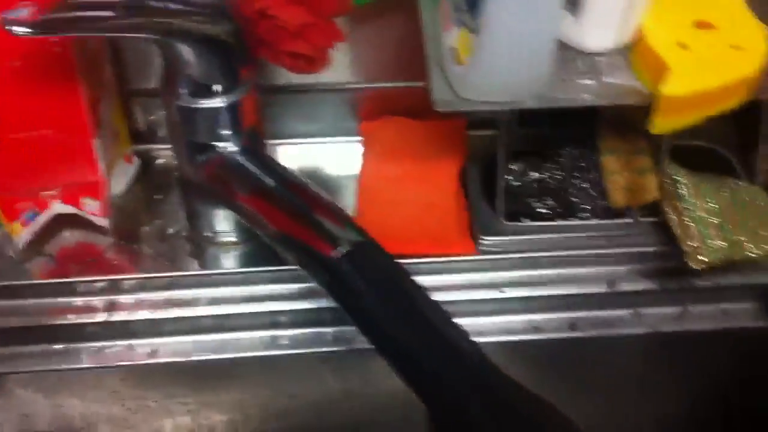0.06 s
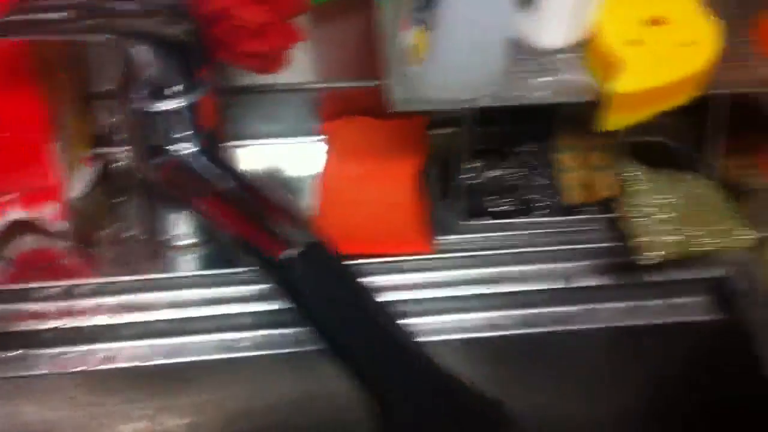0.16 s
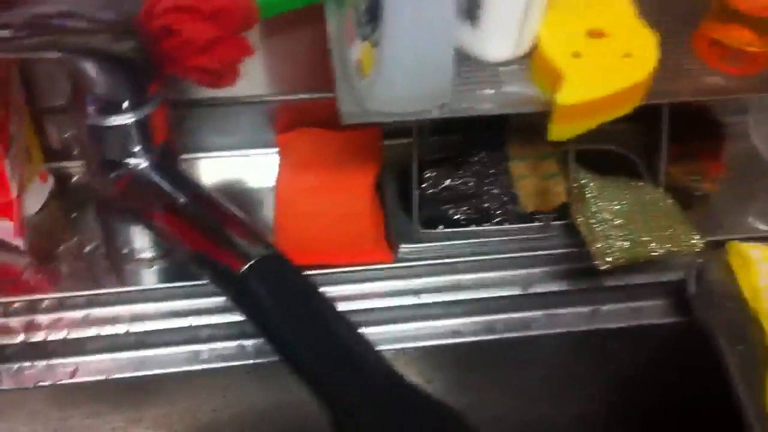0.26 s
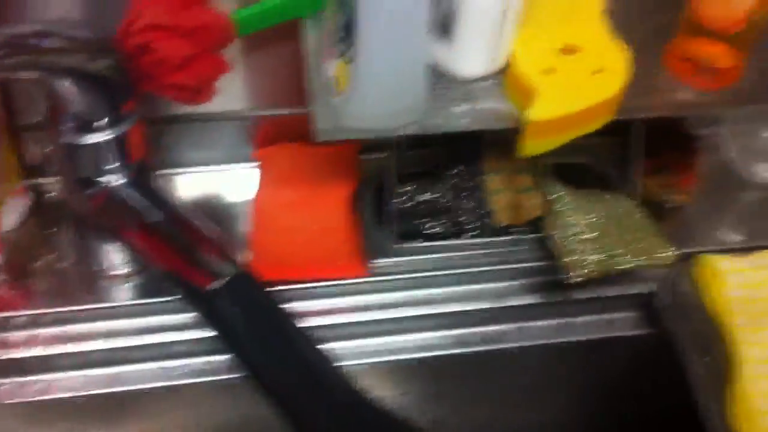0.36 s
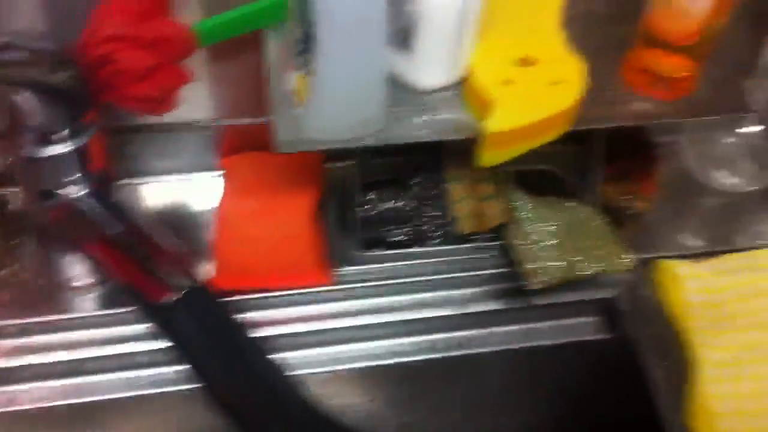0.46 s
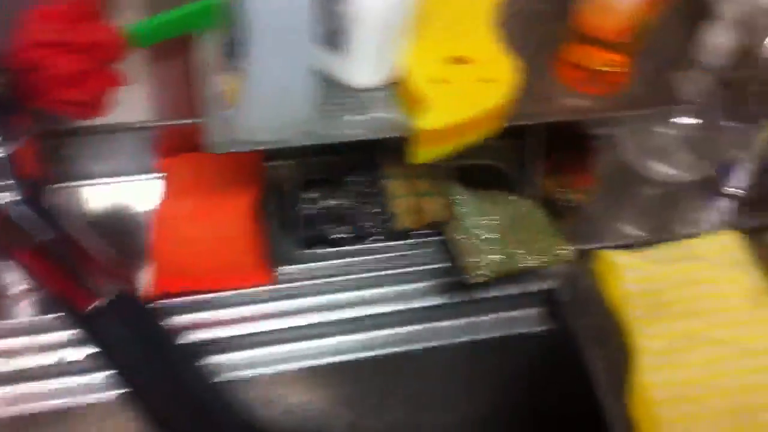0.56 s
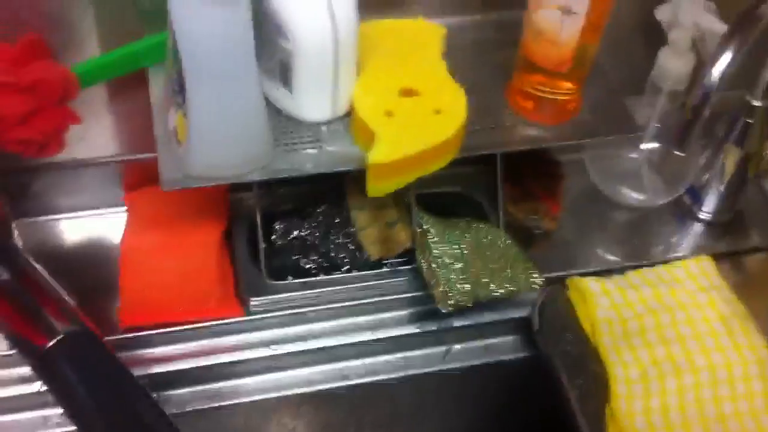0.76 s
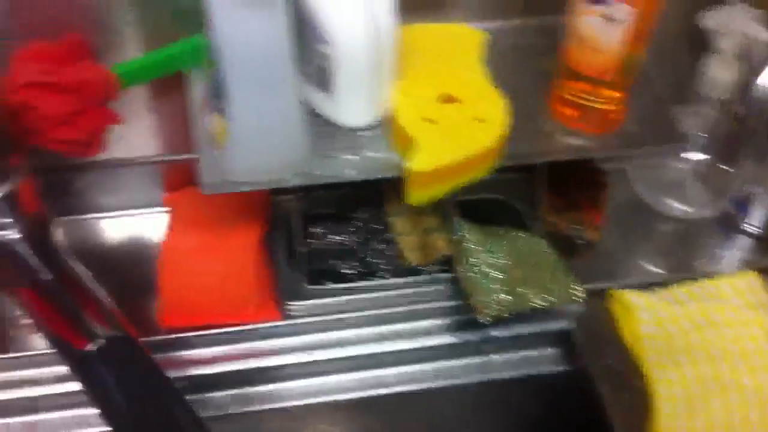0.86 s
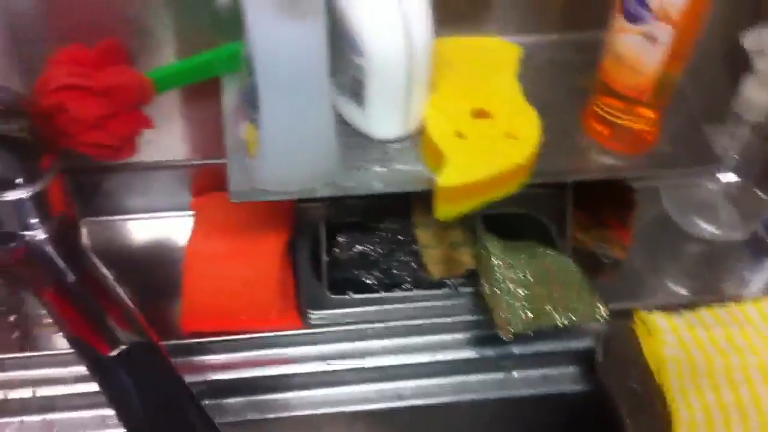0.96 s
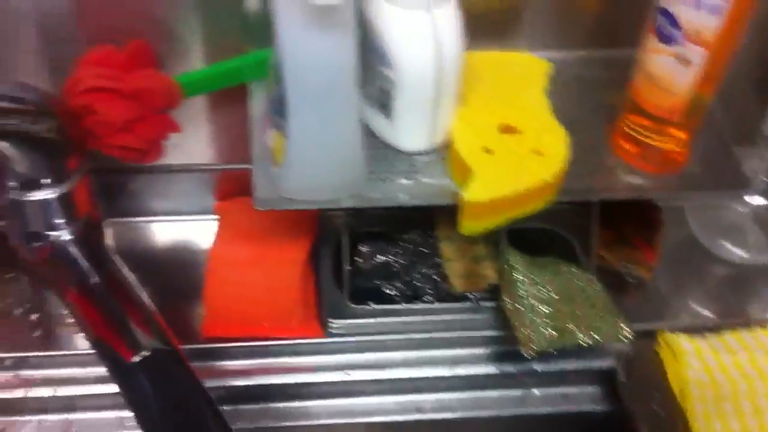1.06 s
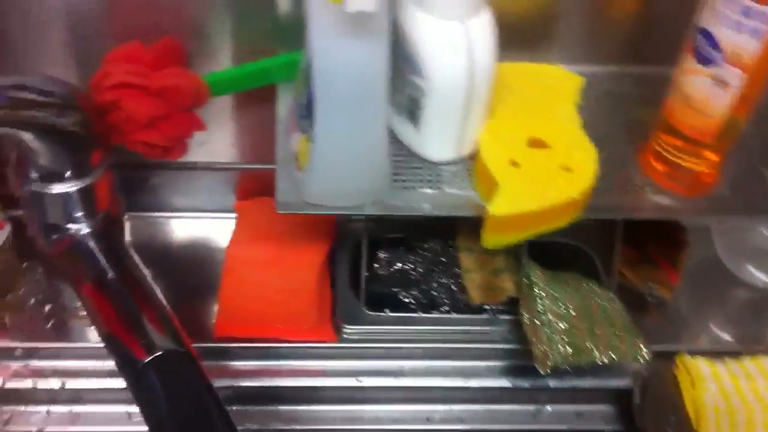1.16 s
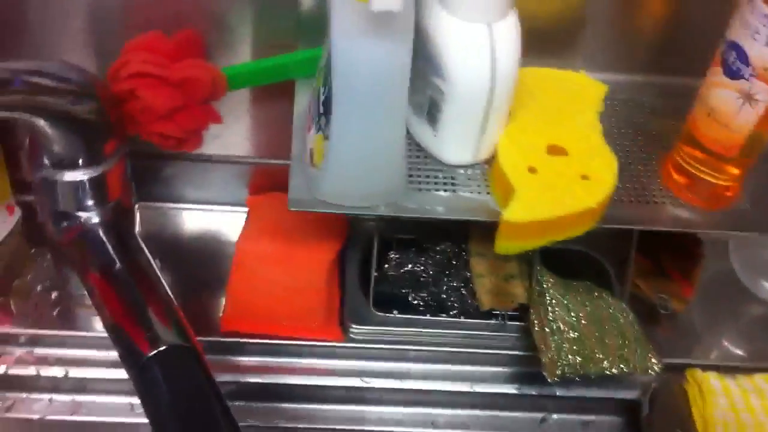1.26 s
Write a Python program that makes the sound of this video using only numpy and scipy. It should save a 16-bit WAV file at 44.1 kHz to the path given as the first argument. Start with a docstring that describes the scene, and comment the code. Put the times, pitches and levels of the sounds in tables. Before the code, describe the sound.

Loud clatter of a dish falling in a stainless-steel sink, quick softer bounces, then a dull settling rub

```python
"""A scrape of stainless steel and a dull bump open: a dish slides off its rest in a sink and falls.
It lands with a bright crack, then bounces in quick, mostly softer blows that ring dish and basin modes.
It rocks with soft thumps, rubs along the steel and settles with dull bumps; a small kitchen answers.
Blows feed decaying sines and noise bands; trains of tiny jerks, coloured or ringing modes, make the rubbing."""
import sys
import numpy as np
from scipy import signal
from scipy.fft import rfft, irfft
from scipy.io import wavfile

SR = 44100
rng = np.random.default_rng(int(sys.argv[2]) if len(sys.argv) > 2 else 0)


def digitize_waveform(pressure):
    """Quantize a signal to 16-bit integers and store it at the path in sys.argv[1].

    Rows of a 2-D input are taken as channels; values are limited to [-1, 1].
    """
    field = np.atleast_2d(pressure).T
    bounded = np.clip(field, -1, 1)
    quanta = np.round(bounded * 32767).astype(np.int16)
    wavfile.write(sys.argv[1], SR, quanta)


N = 57330
T = np.arange(N) / SR

# Bounces on the basin: (time [s], strength [dB], contact brightness [Hz], extra basin boom [dB])
BOUNCES = [(0.2209, 3, 14500, -2), (.2248, -28, 14000, -14), (0.2427, -14, 3000, 6.5),
           (0.301, -12, 16000, 0.5), (0.363, -12.5, 5900, -6.5), (0.416, -17.5, 1900, -5),
           (0.465, -26.5, 2480, -11), (.4997, -25.5, 1190, 1), (0.546, -30.5, 1190, 6),
           (0.581, -32, 1000, -16), (0.624, -29, 900, 0), (0.923, -43.5, 14000, -10)]
# Ringing of the dish: (frequency [Hz], level [dB], t60 [s])
DISH_MODES = [(1062.4, -29, 0.23), (1390, -16.5, 0.042), (1500, -39, .2), (1863, -37, 0.28),
              (2190.4, -26, 0.36), (3040, -31.5, 0.15), (3337, -33.5, 0.27), (5230, -25.5, 0.086),
              (5370, -32.5, .11), (7350, -23.5, 0.075), (9040, -37, 0.26), (11600, -23.5, 0.083),
              (13700, -30.5, 0.11), (14900, -36, .11)]
# Low modes of the steel basin: (frequency [Hz], level [dB], t60 [s])
BASIN_MODES = [(127.9, -40, 0.68), (165.3, -32, 0.61), (201.3, -22, .25), (291.2, -18, .16),
               (332, -27.5, 0.31), (451.3, -20.5, 0.067), (485.2, -18.5, 0.087), (759.4, -40, 0.8)]
BASIN_BUILD_S = 0.003   # the boom takes a moment to spread over the basin
# Wash of crowded sheet-steel modes: (frequency [Hz], relative level [dB per Hz], t60 [s])
STEEL_WASH = [(40, -4.5, 0.13), (133, -4, 0.072), (400, 3, 0.28), (800, 1.5, .14), (1340, 0.5, 0.13),
              (3000, -3, .12), (5210, -5.5, 0.13), (6440, -10.5, 0.16), (11600, -13, 0.17),
              (16000, -5.5, .11)]
WASH_DB, WASH_BUILD_S = -9.5, 0.00074   # sets in almost at once
CRACK_DB, CRACK_T60_S, CRACK_LOW_HZ = -7.5, 0.054, 900   # bright contact crack, thin below CRACK_LOW_HZ


def clatter():
    """Each blow cracks, then rings the dish, sheet steel and basin; its contact brightness limits the treble."""
    times, strength_db, bright_hz, boom_db = np.transpose(BOUNCES)

    def drive_db(hz):
        """Blow strengths at a frequency, falling off above each contact's brightness."""
        return strength_db - 10 * np.log10(1 + (hz / bright_hz) ** 2)

    steel = 0
    for hz, band, t60 in bands(STEEL_WASH):
        low_cut = hz / np.hypot(hz, CRACK_LOW_HZ)
        crack = swing(times, CRACK_DB + drive_db(hz), CRACK_T60_S) * low_cut
        wash = swing(times, WASH_DB + drive_db(hz), t60, WASH_BUILD_S)
        steel = steel + band * np.hypot(crack, wash)   # energies add
    dish = struck(DISH_MODES, times, drive_db, build_s=0, waver_hz=4.18)
    basin = struck(BASIN_MODES, times, lambda hz: drive_db(hz) + boom_db, BASIN_BUILD_S, waver_hz=6.6)
    return steel + dish + basin


# The rim sliding over steel before the fall: (time [s], level [dB])
SLIDE_LEVEL = [(0, -47.5), (.06, -54.5), (.098, -54.5), (.12, -47.5), (.15, -46.5), (.17, -47.5),
               (.186, -50), (.204, -58.5), (.212, -62.5)]
# Tone of the scrape: (frequency [Hz], relative level [dB per Hz])
SCRAPE_COLOUR = [(60, -15.5), (200, 6), (500, -1), (900, 0.5), (1700, 8), (3200, 0), (4300, -1),
                 (5200, -3.5), (6200, -9.5), (15000, -16)]
SLIDE_RING_DB = -13   # dish ringing relative to the scrape
# Resonances of the scraping rim: (frequency [Hz], relative level [dB], t60 [s])
SQUEAK_MODES = [(3323, -5, 0.041), (5290, 1.5, 0.018), (7820, -12.5, 0.11), (10800, -16, .05),
                (11620, -15.5, .06), (13720, -8.5, .06)]
# The squeak over time: (time [s], level [dB])
SQUEAK_CURVE = [(0, -56.5), (.09, -59.5), (.12, -50.5), (.17, -54), (.185, -43), (.205, -82)]


def slide():
    """Stick-slip jerks of the rim scrape the steel, ring the dish and squeak, until it falls free."""
    jerks = slips()
    ring = rms_one(through(jerks, ringing(DISH_MODES)))
    scrape = coloured(jerks, SCRAPE_COLOUR) + from_db(SLIDE_RING_DB) * ring
    squeak = rms_one(through(slips(), ringing(SQUEAK_MODES)))
    before_fall = T < SLIDE_LEVEL[-1][0]
    return (scrape * level(SLIDE_LEVEL) + squeak * level(SQUEAK_CURVE)) * before_fall


# The dish rocking from rim to rim: (time [s], level [dB])
TILTS = [(0.36, -20.5), (0.43, -32.5), (.464, -32), (0.546, -32), (0.575, -33.5), (0.62, -31.5),
         (0.656, -35), (0.686, -39.5), (0.713, -34.5), (0.816, -37.5), (0.849, -35), (.888, -37.5),
         (.918, -55), (0.952, -41.5), (1.036, -40.5), (1.166, -40.5)]
# Modes of the soft thump: (frequency [Hz], level [dB], t60 [s])
TILT_MODES = [(324, -4.5, .11), (369, -11, 0.2), (490, -14.5, 0.17)]


def rocking():
    """Each tilt of the dish thumps the basin floor, exciting three low modes with a short build-up."""
    times, level_db = np.transpose(TILTS)
    return struck(TILT_MODES, times, lambda hz: level_db, build_s=0.0033, waver_hz=12.6)


# The rim rolling and rubbing as it settles: (time [s], level [dB])
RUB_LEVEL = [(0.382, -53.5), (.55, -45.5), (.66, -49.5), (.77, -51.5), (.91, -53), (1.03, -58.5),
             (1.15, -58.5), (1.21, -69.5), (1.3, -76)]
# Its dull tone: (frequency [Hz], relative level [dB per Hz])
RUB_COLOUR = [(60, -14.5), (180, 2), (340, 2), (600, 2.5), (1500, -5.5), (2300, -10.5), (3000, -12),
              (3800, -20.5), (7000, -27), (15000, -37.5)]
# A thin rasp as the rim skids: (time [s], level [dB])
RASP_LEVEL = [(0.751, -96), (.91, -68), (.96, -65.5), (1.04, -61.5), (1.09, -79)]
# Its narrow tone: (frequency [Hz], relative level [dB per Hz])
RASP_TONE = [(1500, -39), (2400, 4), (2950, 2), (3300, -10), (4500, -24)]
# Faint treble hiss in the dying rattle: (time [s], level [dB])
HISS_LEVEL = [(.45, -94), (.56, -70), (.67, -61.5), (.77, -76), (.93, -89), (1.0, -100)]
# Its bright tone: (frequency [Hz], relative level [dB per Hz])
HISS_TONE = [(1500, -20), (5000, 13), (7000, -5), (12000, 0.5), (16000, -6)]


def roll():
    """The rocking rim rubs dully along the basin floor: three coloured slip trains, rub, rasp and hiss."""
    rub = coloured(slips(), RUB_COLOUR) * level(RUB_LEVEL)
    rasp = coloured(slips(), RASP_TONE) * level(RASP_LEVEL)
    hiss = coloured(slips(), HISS_TONE) * level(HISS_LEVEL)
    return rub + rasp + hiss


# Dull bumps against the sink's side: (time [s], thud level [dB], clack level [dB])
SIDE_BUMPS = [(.001, -37.5, -53), (0.489, -33, -57), (.805, -47, -57), (1.114, -41.5, -49.5),
              (1.142, -39, -47), (1.168, -42.5, -79)]
# Low modes of a bump: (frequency [Hz], level [dB], t60 [s])
THUD_MODES = [(166, -8.5, 0.18), (204.25, -7, .15)]
# Higher modes of a bump: (frequency [Hz], level [dB], t60 [s])
CLACK_MODES = [(1260, -8.5, 0.13), (1530, -1, 0.03), (1600, -15.5, .07)]


def bumps():
    """Soft knocks set off low thud modes and short clack modes."""
    times, thud_db, clack_db = np.transpose(SIDE_BUMPS)
    thud = struck(THUD_MODES, times, lambda hz: thud_db, BASIN_BUILD_S, waver_hz=8)
    clack = struck(CLACK_MODES, times, lambda hz: clack_db, BASIN_BUILD_S, waver_hz=25)
    return thud + clack


# Kitchen reverberation: (frequency [Hz], relative level [dB], t60 [s])
KITCHEN_TAIL = [(60.2, -9.5, .6), (200, 1.5, 1), (497, -1.5, 0.76), (1500, 1, 0.82), (4000, 0, .55),
                (8000, -20, 0.91), (16000, -13, .35)]
KITCHEN_DB, KITCHEN_DELAY_S = -45, 0.0068


def kitchen(x):
    """Diffuse reverberation after a short gap: noise bands that each decay at their own rate."""
    tail = sum(band * np.exp(-np.log(1000) * T / t60) for _, band, t60 in bands(KITCHEN_TAIL))
    return from_db(KITCHEN_DB) * through(x, tail * (T > KITCHEN_DELAY_S))


# Room background: (frequency [Hz], relative level [dB per Hz])
BACKGROUND_COLOUR = [(30, -23), (70, -29.5), (170, 4.5), (330, 2), (700, -6.5), (2000, -19.5), (6000, -27),
                     (15000, -30.5)]
BACKGROUND_DB = -58


def background():
    """Steady coloured noise for the quiet room."""
    return from_db(BACKGROUND_DB) * coloured(rng.standard_normal(N), BACKGROUND_COLOUR)


def from_db(db):
    """Decibels to gain."""
    return 10 ** (np.asarray(db) / 20)


def rms_one(x):
    """Scale to unit rms."""
    return x / np.sqrt(np.mean(x ** 2) + 1e-20)


def at_hz(points, hz, axis=1):
    """Read one column of a table on a log-frequency axis."""
    p = np.array(points)
    return np.interp(np.log(hz), np.log(p[:, 0]), p[:, axis])


def level(points):
    """Gain over time from (time [s], level [dB]) points; silent before the first, held after the last."""
    return from_db(np.interp(T, *np.transpose(points), left=-np.inf))


def through(x, response):
    """Play x through an impulse response."""
    return signal.fftconvolve(x, response)[:N]


def coloured(x, spectrum):
    """Filter a steady signal by a spectrum; rms 1."""
    hz = np.maximum(np.fft.rfftfreq(N, 1 / SR), 1)
    return rms_one(irfft(rfft(x) * from_db(at_hz(spectrum, hz)), N))


def ringing(modes):
    """Impulse response of a set of modes: decaying sines."""
    return sum(from_db(db) * np.sin(2 * np.pi * hz * T) * np.exp(-np.log(1000) * T / t60)
               for hz, db, t60 in modes)


def slips():
    """Tiny stick-slip jerks of equal size and random sign, about 2800 per second."""
    return (rng.random(N) < 2800 / SR) * rng.choice([-1, 1], N)


def pulses(times, gains_db):
    """One click at each time."""
    out = np.zeros(N)
    out[np.clip(times * SR, 0, N - 1).astype(int)] = from_db(gains_db)
    return out


def swing(times, gains_db, t60, build_s=0):
    """Amplitude of a vibration that each blow tops up with energy, at once or over a short build-up."""
    keep = from_db(-60 / (t60 * SR)) ** 2   # energy kept per sample
    feed = np.exp(-1 / (build_s * SR)) if build_s else 0
    energy = signal.lfilter([1], [1, -keep], pulses(times, gains_db) ** 2 + 1e-18)
    built = signal.lfilter([(1 - feed) ** 2], [1, -2 * feed, feed ** 2], energy)
    return np.sqrt(built)


def tone(hz, waver_hz):
    """A sine whose pitch wavers slightly, drifting to a new random offset every 15 ms."""
    knots = np.arange(0, 2, 0.015)
    waver = np.interp(T, knots, rng.standard_normal(len(knots)))
    return np.sin(2 * np.pi * np.cumsum(hz + waver_hz * waver) / SR)


def struck(modes, times, drive_db, build_s, waver_hz):
    """Modes set ringing by blows; drive_db gives the blows' strengths at a frequency."""
    return sum(tone(hz, waver_hz) * swing(times, db + drive_db(hz), t60, build_s)
               for hz, db, t60 in modes)


def bands(table):
    """Third-octave bands of noise that stand for countless modes: (centre [Hz], band, t60 [s])."""
    edges = np.geomspace(25, 18000, 29)
    hz = np.fft.rfftfreq(N, 1 / SR)
    white = rfft(rng.standard_normal(N))
    for low, high in zip(edges, edges[1:]):
        centre = np.sqrt(low * high)
        band = irfft(white * ((hz >= low) & (hz < high)), N)
        yield centre, band * from_db(at_hz(table, centre)), at_hz(table, centre, axis=2)


def scene():
    """Dish and sink in the kitchen, over a quiet background."""
    sink = clatter() + slide() + rocking() + roll() + bumps()
    return (sink + kitchen(sink) + background())[None]


def record(dry):
    """The microphone thins the deep bass, peaks are rounded, the top is cut."""
    low_cut = signal.butter(2, 85, "high", fs=SR, output="sos")
    top_cut = signal.ellip(10, 0.2, 80, 15900, fs=SR, output="sos")
    ceiling = 0.8
    rounded = ceiling * np.tanh(signal.sosfilt(low_cut, dry) / ceiling)
    return signal.sosfilt(top_cut, rounded)


dry = scene()
out = record(dry)
digitize_waveform(out)
```